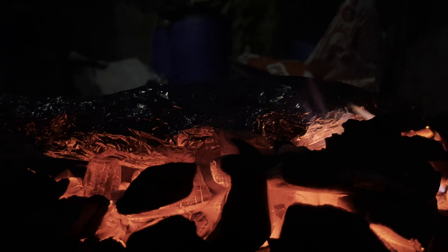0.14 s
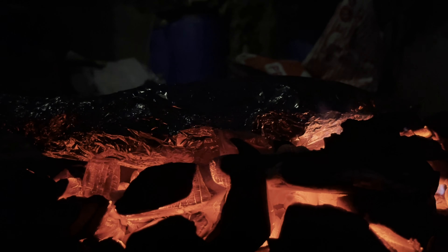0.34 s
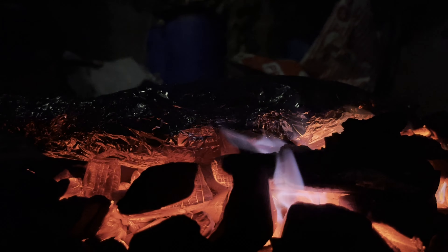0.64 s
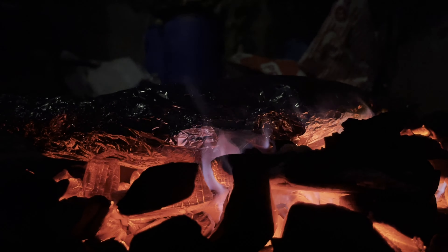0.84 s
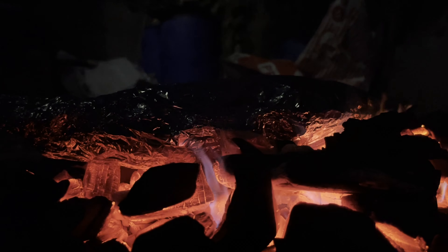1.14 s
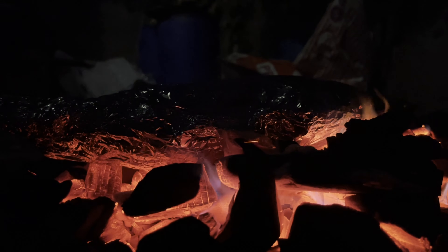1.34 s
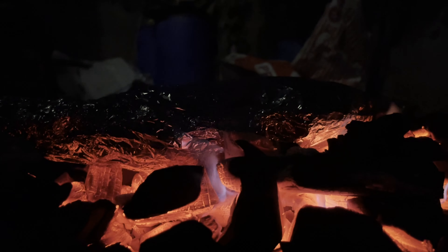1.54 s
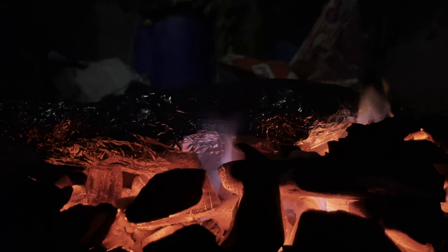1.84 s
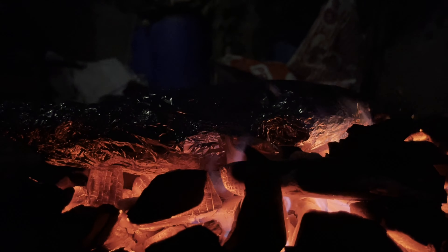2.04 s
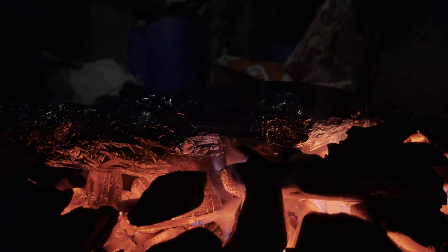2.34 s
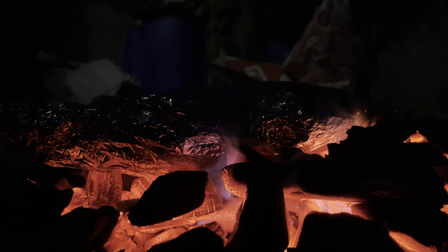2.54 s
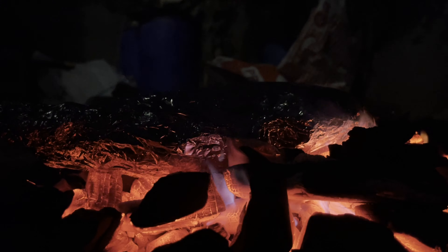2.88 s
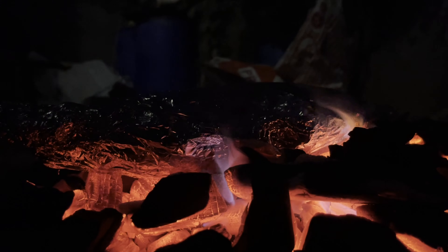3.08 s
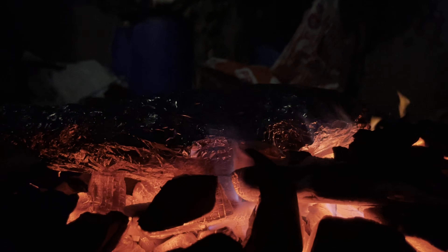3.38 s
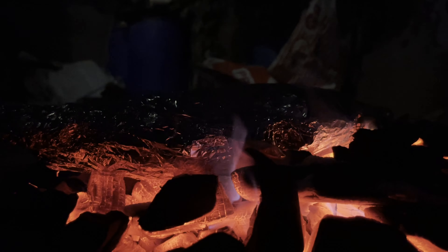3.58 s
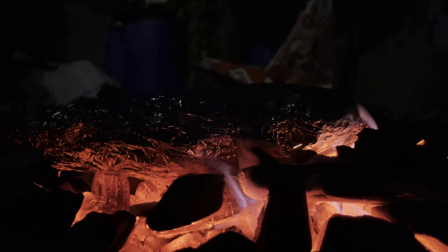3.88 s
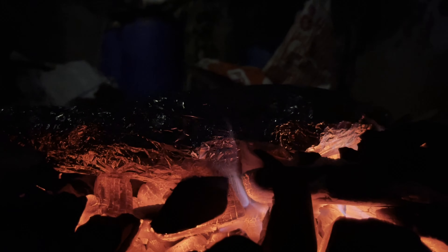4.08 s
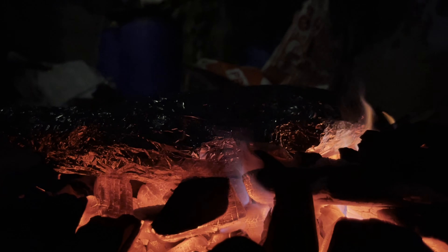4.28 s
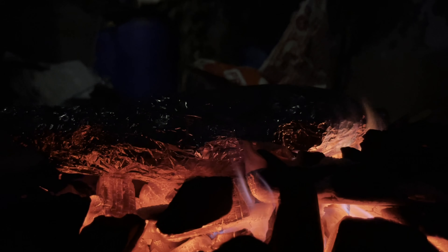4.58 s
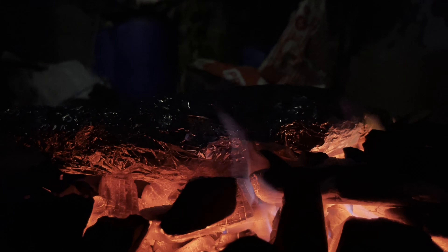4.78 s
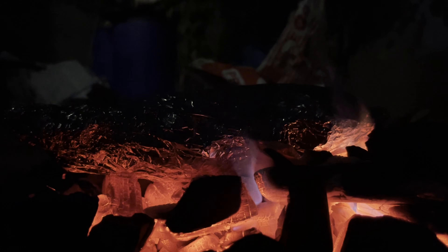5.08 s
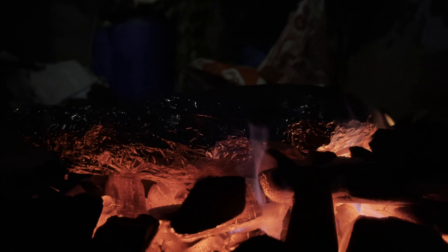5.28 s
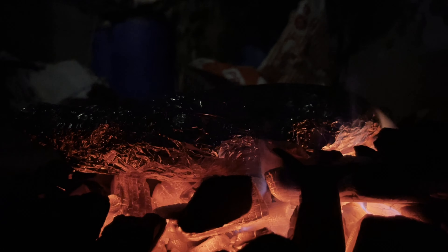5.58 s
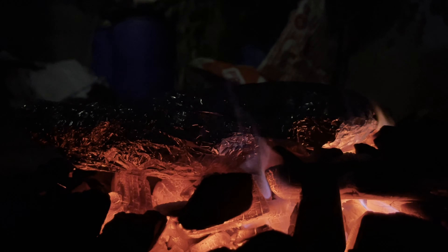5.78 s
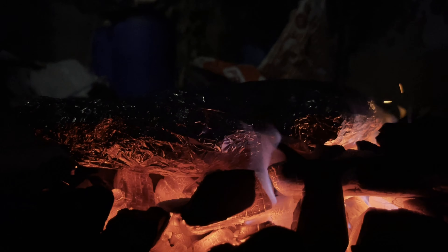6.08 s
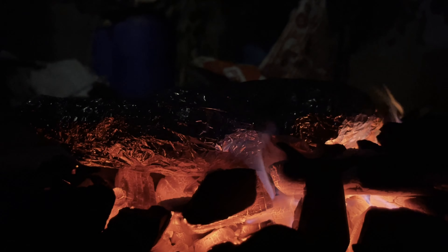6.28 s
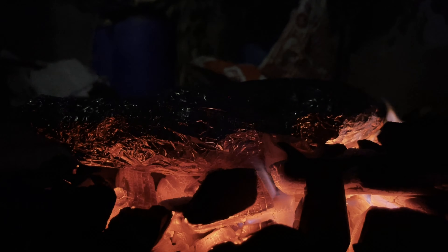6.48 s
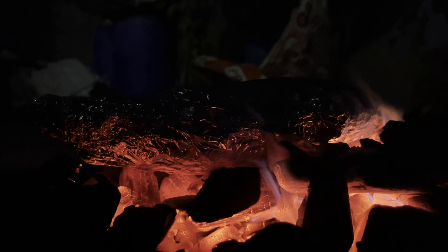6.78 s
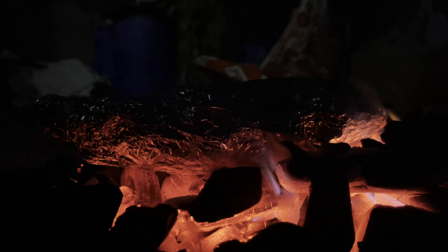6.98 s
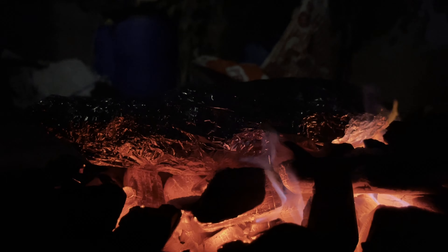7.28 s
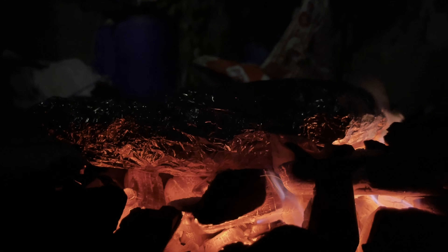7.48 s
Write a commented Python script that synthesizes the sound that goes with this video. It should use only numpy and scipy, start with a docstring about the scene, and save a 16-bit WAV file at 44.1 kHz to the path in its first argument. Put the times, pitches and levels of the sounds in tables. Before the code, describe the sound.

A close stereo perspective on glowing charcoal outdoors, dry and quiet. Throughout, a low flame rumble gusts gently beneath soft broadband hiss, fine high crackling in uneven clumps and faint gritty ash ticks; an almost inaudible thin hum near 530 Hz wavers far behind. From 0 to 1 second, small bright pops come often, with firmer snaps at about 0.4 and 0.7 and a brief splintery ring near 0.9. Sparse pops follow, with a dull settling knock at 2.2 and another near 2.6. A hard snap and knock land at 4.0. The loudest crack, piercing and briefly ringing, strikes at 4.85, with lesser snaps just after. Another sharp ringing crack comes at 5.45, then a pop at 6.0. Light crackle continues; knocks gather around 7.1 to 7.4, and a crisp pop with tiny low throbs closes after 7.5.

```python
"""Low flame rumble and hiss lie under bright pops of cracking char and a fine crackle.
It is a bed of charcoal embers under foil parcels outdoors, heard close by through a pair of microphone ports.
Rumble, hiss and crackle are shaped noise; pops are noise bursts that excite a ring in the port cavity.
Lumps settle as knocks of sagging pitch, splinters and foil ring as dying sines, ash ticks through resonators,
brief low notes swell, and a thin wavering hum stands far behind."""
import sys
import numpy as np
from scipy import signal
from scipy.fft import rfft, irfft
from scipy.io import wavfile
from scipy.ndimage import uniform_filter1d

SR = 44100
rng = np.random.default_rng(int(sys.argv[2]) if len(sys.argv) > 2 else 0)


def master_out(mix):
    """Clip the mix to full scale and print it as 16-bit PCM to the path in sys.argv[1]."""
    frames = np.transpose(np.atleast_2d(mix))
    ceiling = np.clip(frames, -1, 1)
    pcm = np.round(ceiling * 32767).astype(np.int16)
    wavfile.write(sys.argv[1], SR, pcm)


N = 336483
HZ = np.maximum(np.arange(N // 2 + 1) * SR / N, 1)   # spectrum bins, kept above zero for the logarithm
QUARTER_TURN = np.array([[0], [np.pi / 2]])   # phase of the two renderings of a tone, rad

# edges of the bands in which each crack gets its level: edge_hz
BAND_EDGES_HZ = [1800, 3300, 5200, 7500, 9800, 12300, 17000]


def amp(db):
    """Decibels to gain."""
    return 10 ** (np.asarray(db) / 20)


def rms_one(x):
    """Scale to unit power."""
    return x / np.sqrt(np.mean(x ** 2) + 1e-20)


def at_hz(points, hz):
    """Read a spectrum table on a log-frequency axis."""
    table_hz, table_value = np.array(points).T
    return np.interp(np.log(hz), np.log(table_hz), table_value)


def colour(x, spectrum):
    """Shape a steady sound by a spectrum table."""
    return irfft(rfft(x) * amp(at_hz(spectrum, HZ)), N)


def drift(rate_hz):
    """Slow chance of spread 1: noise through two equal poles, computed at every 40th sample."""
    r = np.exp(-80 * np.pi * rate_hz / SR)
    noise = rng.standard_normal(N // 40 + 2002)
    slow = signal.lfilter([1], [1, -2 * r, r * r], noise)[2000:]   # the filter has settled
    return np.interp(np.arange(N) / 40, np.arange(len(slow)), rms_one(slow))


def band(x, lo_hz, hi_hz):
    """Band-pass."""
    return signal.sosfilt(signal.butter(2, [lo_hz, hi_hz], "band", fs=SR, output="sos"), x)


def add(out, s, piece):
    """Mix a short sound in at a time."""
    i = int(s * SR)
    out[:, i:i + piece.shape[1]] += piece[:, :N - i]


def hum(pitch_hz=528.6, wander_hz=3.505, level_db=-66.5, flicker_db=2.5):
    """A thin far tone whose pitch and level waver a little."""
    phase = 2 * np.pi * np.cumsum(pitch_hz + wander_hz * drift(7.75)) / SR
    level = amp(level_db + flicker_db * drift(9.0))
    return level * rms_one(np.sin(phase + QUARTER_TURN))


def hiss(level_db=-55.5, flicker_db=1.76):
    """Flame hiss and far air: broad noise whose level flickers."""
    # colour of the hiss: freq_hz, relative_db (per Hz)
    hiss_colour = [(120, -10), (250, 3), (500, -4.5), (1000, -6.5), (2000, -14), (2900, -15), (4000, -23.5),
                   (5000, -20.5), (6300, -17), (7500, -19.5), (9500, -17), (11000, -14), (12200, -40),
                   (13000, -51)]
    level = amp(level_db + flicker_db * drift(27.4))
    return level * rms_one(colour(rng.standard_normal((2, N)), hiss_colour))


def rumble(level_db, gust_db=1, gust_rate_hz=3):
    """Low turbulence of the small flames: dark noise that gusts gently."""
    # colour of the rumble: freq_hz, relative_db (per Hz)
    rumble_colour = [(11, -63), (18, -34), (52, 0), (97, 2.5), (119, 2), (307, -21.5), (500, -21.5),
                     (650, -27.5), (1100, -120)]
    level = amp(level_db + gust_db * drift(gust_rate_hz))
    return level * rms_one(colour(rng.standard_normal((2, N)), rumble_colour))


def flames(rumble_db):
    """The steady bed: turbulent rumble and broad hiss, with the hum behind."""
    return rumble(rumble_db) + hiss() + hum()


def crackle(level_db, per_s, spread_db, clump_db, grain_t60):
    """Tiny cracks at random, in clumps, of very uneven size; each a short burst of noise."""
    # colour of the crackle: freq_hz, gain_db
    crackle_colour = [(1500, -16.5), (4000, -4), (7000, -8), (9000, 1.5), (10700, 8), (12000, -3.5),
                      (12700, -28), (14800, -59), (16400, -60)]
    born = rng.random(N) < per_s * amp(clump_db * drift(14)) / SR
    sizes = amp(spread_db * np.minimum(rng.exponential(1, N), 4.0))
    fade = amp(-60 / (grain_t60 * SR))   # per sample, grain_t60 in s
    shape = signal.lfilter([1], [1, -fade], born * sizes + 1e-18)
    return amp(level_db) * rms_one(colour(shape * rng.standard_normal((2, N)), crackle_colour))


def ticks(gain_db, per_s, spread_db, cycles):
    """Faint dull ticks of ash and grit, each a resonance that falls 60 dB in a few cycles of its pitch."""
    sizes = amp(spread_db * np.minimum(rng.exponential(1, N), 2.5))
    signs = rng.choice([-1, 1], (2, N))
    born = (rng.random(N) < per_s / SR) * sizes * signs
    dealt, out = rng.integers(0, 10, N), 0   # which of ten pitches each tick gets
    for k, hz in enumerate(np.geomspace(800, 5000, 10)):
        r, w = amp(-60 * hz / (cycles * SR)), 2 * np.pi * hz / SR
        hits = born * (dealt == k) + 1e-18
        out = out + signal.lfilter([0, np.sin(w)], [1, -2 * r * np.cos(w), r * r], hits)
    return amp(gain_db) * out


def throbs():
    """A low note swells briefly: a sine under a half-sine envelope."""
    # the swells: start_s, peak_db, pitch_hz, length_s
    swells = [(7.534, -37.5, 178, 0.012), (7.565, -36.5, 187, 0.04), (7.608, -36.5, 156, 0.01)]
    out = np.zeros((2, N))
    for s, peak_db, hz, length_s in swells:
        t = np.arange(int(length_s * SR)) / SR
        swell = amp(peak_db) * np.sin(np.pi * t / length_s)
        add(out, s, swell * np.sin(2 * np.pi * hz * t + QUARTER_TURN))
    return out


def knocks(sag=0.85, sag_cycles=0.33, rise_share=0.13, top_ratio=5.5, fall_bend=1.4):
    """A soft edge, then a few cycles whose pitch sags as the lump comes to rest; dull high above its pitch."""
    # lumps settling: start_s, peak_db (before dulling), pitch_hz (after the sag),
    # fall_cycles (to fall 30 dB; below 0.5 counts as 0.5)
    lumps = [(0.684, -41, 448, 2), (0.722, -39, 850, -0.5), (0.764, -43, 600, 2), (0.934, -43.5, 850, 2.5),
             (0.995, -47, 526, 6), (1.507, -48, 700, 2), (1.5462, -56, 620, 2), (1.675, -55, 840, 10),
             (1.7427, -43, 900, -3.5), (1.9606, -48, 650, 3.5), (2.0909, -46, 495, 7),
             (2.218, -30.5, 372, 2), (2.5843, -34.5, 960, 1.5), (3.02, -40, 650, 1.5),
             (3.069, -45, 520, 1.5), (3.1086, -42, 480, 2), (3.2645, -41, 890, 1.5),
             (3.4819, -43.5, 900, 0.5), (3.551, -42, 950, 1.5), (3.5643, -42.5, 855, 1.5),
             (3.8458, -38.5, 596, 2), (3.9725, -31.5, 910, 0.5), (4.478, -43, 750, 2), (4.651, -44, 800, 1),
             (4.7099, -46, 497, 1), (5.0273, -52, 620, 3), (5.2307, -36.5, 710, 2.5), (5.4493, -50, 794, 8),
             (5.4822, -46, 770, 6), (6.115, -48, 800, 4), (6.3028, -48.5, 620, 3), (6.8245, -43.5, 440, 3),
             (6.8394, -46.5, 550, 1.5), (7.0657, -42, 580, -2.5), (7.0962, -41.5, 575, 2.5),
             (7.2627, -38, 484, 1), (7.2904, -37, 714, 1), (7.3601, -34, 540, 2)]
    out, t = np.zeros((2, N)), np.arange(1300) / SR
    for s, peak_db, hz, cycles in lumps:
        turns, cycles = hz * t, max(cycles, .5)
        rise = 1 - np.exp(-turns / (rise_share * cycles))
        shape = rise * amp(-30 * (turns / cycles) ** fall_bend)
        phase = 2 * np.pi * (turns + sag * (1 - np.exp(-turns / sag_cycles)))
        knock = amp(peak_db) * shape / shape.max() * np.sin(phase + QUARTER_TURN)
        dull = signal.butter(4, top_ratio * hz, fs=SR, output="sos")
        add(out, s, signal.sosfilt(dull, knock))
    return out


def rings(rise_s=.0004, roughness=0.6, rough_s=0.004):
    """Dying sines, rough while the char still tears; opposed renderings leave them weaker at the right port."""
    # splinters and foil ringing after a crack, and the port cavity ringing on near 11 kHz after the loudest
    # cracks: start_s, pitch_hz, level_db (before rise and roughness), t60_s
    splinters = [(0.1646, 6100, -54, .02), (0.3866, 6150, -22, 0.0063), (0.684, 6000, -50, .015),
                 (0.7145, 4200, -49.5, .006), (0.735, 2500, -40, 0.03), (0.736, 2400, -46, .012),
                 (0.9245, 3260, -38, 0.0092), (0.9245, 5300, -41, .008), (0.9250, 4260, -31.5, 0.013),
                 (0.9256, 4470, -38, .009), (0.9625, 4400, -50, .025), (1.0388, 6500, -56, 0.01),
                 (1.171, 6240, -45, .01), (1.8093, 2750, -47.5, 0.022), (2.4608, 4900, -43.5, .015),
                 (2.4608, 5800, -49, .008), (2.4755, 5600, -50, .008), (2.559, 6500, -43, 0.02),
                 (2.9010, 4800, -48.5, 0.018), (2.9010, 5500, -34.5, 0.0061), (3.859, 5500, -43, .01),
                 (3.972, 6850, -11, 0.0039), (4.054, 2880, -49, .015), (4.0526, 3900, -44, 0.014),
                 (4.494, 5500, -51, .01), (4.8425, 2900, -27, 0.0095), (4.8413, 3160, -26, 0.041),
                 (4.8418, 3700, -23.5, 0.014), (4.842, 3880, -30, 0.022), (4.8418, 4630, -34, .012),
                 (4.8414, 5400, -29.5, 0.012), (4.8418, 6060, -36, .01), (4.8416, 7000, -34, .02),
                 (4.8412, 8900, -25, .012), (4.8414, 9130, -17, 0.004), (4.842, 10840, 0.5, 0.0066),
                 (5.2314, 2810, -37.5, 0.0078), (5.467, 3400, -46, 0.032), (5.466, 4000, -51, 0.027),
                 (5.4648, 4480, -30.5, 0.022), (5.4648, 4900, -33, 0.014), (5.4652, 7100, -29, 0.023),
                 (5.4651, 7540, -30, 0.016), (5.4653, 10970, -11.5, 0.0075), (5.4993, 3390, -50, .03),
                 (6.6688, 6040, -44, 0.022), (6.85, 2620, -43, 0.009), (7.097, 2570, -50.5, 0.011),
                 (7.147, 1400, -43, .01), (7.292, 2520, -38, .006), (7.5352, 11230, -18.5, 0.0071),
                 (7.5365, 6270, -44, .01)]
    out, t = np.zeros((2, N)), np.arange(3000) / SR
    noise = rng.standard_normal((len(splinters), len(t)))
    tearing = rms_one(uniform_filter1d(noise, size=24, axis=1))
    for (s, hz, level_db, t60), tear in zip(splinters, tearing):
        rough = 1 + roughness * tear * np.exp(-t / rough_s)
        shape = amp(level_db - 60 * t / t60) * (1 - np.exp(-t / rise_s))
        add(out, s, shape * rough * np.sin(2 * np.pi * hz * t) * [[1], [-1]])
    return out


def all_pops(count=70, level_db=-57, under_db=-6.5, fall_db=15.5, t60_s=0.011):
    """The listed cracks in the char, then faint ones at random times."""
    # cracks: start_s, level_db (rms of the first 3 ms in the port-ring band), under_db (below the ring,
    # against level_db, before the fall), fall_db_per_octave (below), t60_s
    listed = [(0.0543, -48, -12.5, 3, 0.0108), (0.079, -47, 0.5, 16, 0.023),
              (0.1642, -40.5, -5.5, 19, 0.0078), (0.2037, -49, -7, 17, 0.0087),
              (0.3852, -45, 0, 20, 0.0092), (0.3863, -33, 0, 29, 0.0067), (0.424, -54, 1, 5, 0.0103),
              (0.4675, -40.5, -35, 9, 0.0038), (0.5336, -50.5, 8, 24, 0.0059),
              (0.5621, -41, -6.5, 15, 0.018), (0.7254, -48, -8, 7, 0.016), (0.7346, -32.5, -2, 22, 0.0048),
              (0.7368, -40, -5, 19, .008), (0.7398, -38, -5, 21, 0.008), (0.8244, -58.5, -7, -7, 0.0087),
              (0.847, -47.5, 2.5, 17, 0.0054), (0.8687, -55, 10.5, 30, 0.0074),
              (0.9245, -46, 3.5, 12, 0.014), (0.9622, -48, -1, 9, 0.016), (1.0388, -37.5, -4.5, 10, 0.0087),
              (1.0535, -51, -3, 12, .006), (1.0923, -49.5, -6, 14, 0.014), (1.171, -48.5, -4, 10, 0.0035),
              (1.282, -62, -11, 20, 0.006), (1.383, -57, 2, 12, 0.01), (1.431, -43.5, -18, 8, 0.005),
              (1.4411, -49.5, 9, 59, 0.0066), (1.4696, -47, -16, 20, 0.0095), (1.528, -47, -23, 4, 0.0048),
              (1.7024, -45, -6.5, 5, 0.0062), (1.8093, -52, 1, 17, 0.0114), (1.828, -49, 2.5, 20, 0.006),
              (1.8739, -48, -11, 0.5, 0.01), (2.204, -50.5, 4.5, 36, 0.011),
              (2.2198, -52, -1.5, 8.5, 0.013), (2.4608, -56, 1, 9, 0.013), (2.5195, -71, 1, 20, 0.01),
              (2.5586, -40, -4, 25, 0.021), (2.63, -48.5, -7.5, 6, 0.0098), (2.6562, -54.5, 4.5, 19, 0.022),
              (2.7842, -48, -7, 12, 0.0088), (2.8328, -43.5, -5.5, 9, 0.01), (2.9265, -44, -12, 14, 0.0061),
              (2.9392, -53, -14, -3, .006), (2.95, -58, -12, 15, .005), (2.9602, -42, -4, 28, 0.01),
              (2.9693, -53, 0, 25, .005), (3.292, -50, -7, 11, 0.0119), (3.305, -45, -12, 8, 0.011),
              (3.6781, -47, -11, 14, 0.0059), (3.7567, -63, 13, 10, 0.012), (3.9722, -27, -10, 9, 0.0033),
              (3.9845, -49, -20, 10, 0.003), (4.0535, -46, 4, 32, 0.018), (4.494, -57, 1, 18, 0.008),
              (4.5068, -52.5, 6, 31, 0.0071), (4.5258, -53, -10, 0, 0.011), (4.5478, -53, 3.5, 25, 0.013),
              (4.6293, -51.5, 7, 41, 0.0096), (4.7544, -46.5, -3, 23, 0.0068), (4.8412, -20, 3, 44, 0.0058),
              (4.9335, -36.5, -4.5, 24, 0.0066), (4.941, -45, 1, 23, 0.0069),
              (4.9464, -49, -10, 20, 0.0087), (5.0452, -50, 1.5, 17, 0.015), (5.085, -49.5, -9, 4, 0.0062),
              (5.18, -49.5, -10, 14, 0.0064), (5.246, -52.5, 3, 18, 0.014), (5.3477, -48.5, 2, 25, 0.012),
              (5.3616, -50.5, 5, 33, 0.0067), (5.395, -54.5, 1, 2, 0.013),
              (5.4645, -26.5, -20.5, 7.5, 0.0062), (5.5052, -43, -12, 4, 0.018),
              (5.517, -42, -14, 9, 0.0049), (5.5529, -52, -9, 9, 0.0075), (5.5874, -47, -10, 22, 0.0151),
              (5.7274, -48, -28.5, -3, 0.0042), (5.7464, -39.5, -9.5, 19, 0.0047),
              (5.91, -49.5, -8, 15, 0.013), (5.9891, -37.5, -10.5, 8, 0.0061), (6.3695, -46, -2, 11, 0.016),
              (6.437, -44, -15, 4, 0.008), (6.5298, -45, 3.5, 44, 0.0048), (6.6784, -46, -2.5, 10, 0.012),
              (6.756, -43, -23, 2, 0.0043), (6.7803, -43, -23.5, -0.5, 0.0037),
              (6.8979, -48, -38, -2, 0.0068), (7.093, -48.5, -7, 3, 0.0079), (7.2605, -52, 0, 20, .005),
              (7.2643, -46.5, -2.5, 14, 0.0058), (7.323, -50.5, 3.5, 41, 0.0073),
              (7.362, -42.5, -6, 24, 0.0043), (7.3938, -41.5, -2, 22, 0.004),
              (7.5349, -37, -13, 23, 0.0061), (7.59, -45.5, -8, 13, 0.014)]
    luck = rng.standard_normal((count, 4))
    s = rng.uniform(0, N / SR, count)
    faint = np.transpose([s,
                          level_db + 1 * luck[:, 0],
                          under_db + 8.1 * luck[:, 1],
                          fall_db + 3.0 * luck[:, 2],
                          t60_s * amp(4.0 * luck[:, 3])])
    return np.vstack([listed, faint])


def pop_bands(level_db, under_db, fall_db):
    """Level of each crack in each band: set at the port ring, with a fall by octaves below it."""
    chance_db = 1.5   # chance colour of the lower bands, dB per octave down
    above_db, above_follows = -12, .4   # band above the ring; share of under_db that it follows
    above_slope, slope_from_db = 0.42, -21   # level rule of the band above the ring: dB per dB, from this level
    centres = np.sqrt(np.multiply(BAND_EDGES_HZ[:-1], BAND_EDGES_HZ[1:]))
    octaves_down = np.log2(centres[3] / centres[:4])[:, None]   # from the band just under the ring
    chance = rng.standard_normal((len(level_db), 4)).T
    below = under_db - fall_db * octaves_down + chance_db * octaves_down * chance
    above = above_follows * under_db + above_db + above_slope * (level_db - slope_from_db)
    return level_db + np.vstack([below, 0 * level_db, above])


def port_ring(x, hz=10850, width_hz=700, lift_db=16.0):
    """The port cavity rings briefly after every crack: a narrow resonance added to the sound."""
    r = np.exp(-np.pi * width_hz / SR)
    poles = [1, -2 * r * np.cos(2 * np.pi * hz / SR), r * r]
    ring = signal.lfilter(np.array([1, 0, -1]) * (1 - r * r) / 2, poles, x)
    return x + amp(lift_db) * ring


def pops(rise_s=0.000063, tail_db=-12.0, tail_t60=0.05, tail_shrinks=0.3):
    """A burst of tearing dies fast, then scatters faintly among the coals, less in share after loud ones."""
    out, t = np.zeros((2, N)), np.arange(2200) / SR
    s, level_db, under_db, fall_db, t60 = np.transpose(all_pops())
    tearing = rng.standard_normal((len(s), 2, len(t)))
    rise = 1 - np.exp(-t / rise_s)
    snap = rise * amp(-60 * t / np.maximum(t60, .002)[:, None])
    shape = snap / snap.max(axis=1, keepdims=True)
    tail_share = amp(tail_db - tail_shrinks * (level_db - level_db.mean()))[:, None, None]
    scatter = band(band(tearing, 1500, 11400), 1500, 11400) * rise * amp(-60 * t / tail_t60)
    bursts = port_ring(tearing * shape[:, None]) + scatter * tail_share
    cracks = 0
    levels = pop_bands(level_db, under_db, fall_db)
    for lo_hz, hi_hz, band_db in zip(BAND_EDGES_HZ, BAND_EDGES_HZ[1:], levels):
        part = band(band(bursts, lo_hz, hi_hz), lo_hz, hi_hz)
        start = part[..., :int(.003 * SR)]
        start_rms = np.sqrt(np.mean(start ** 2, axis=2, keepdims=True))
        cracks = cracks + part * amp(band_db)[:, None, None] / start_rms
    for at, crack in zip(s, cracks):
        add(out, at, crack)
    return out


def ports(x, nearness):
    """Left hears the first rendering; right hears it shifted in phase, mixed with the second rendering."""
    # right port against left: freq_hz, phase_lead_rad; the treble arrives about 0.3 ms early
    right_lead = [(20, .05), (1000, .05), (1900, .6), (3000, -1.0), (4200, -.4), (5000, -1.0), (6200, -.3),
                  (7300, -1.1), (8500, .1), (10220, 3.14), (13550, 9.4), (15200, 12.5), (16500, 14.9)]
    # left-right likeness of a sound of nearness 0: freq_hz, likeness (0 to 1)
    likeness = [(30, 0.8), (60, 1), (200, 0.87), (600, 0.47), (1500, 0.36), (2500, 0.7), (5000, 0.57),
                (7000, 0.31), (8500, 0.85), (11000, 1), (16000, 0.77)]
    # balance of the ports: freq_hz, left_minus_right_db
    left_up = [(60, 0.6), (700, 0.5), (1400, 3.5), (2500, 1), (5000, 1.6), (8000, 0.5), (16000, -1)]
    alike = np.clip(at_hz(likeness, HZ), .01, 1) ** (1 - nearness)   # near sounds reach both more alike
    lead = np.exp(1j * np.interp(HZ, *np.transpose(right_lead)))
    first, second = rfft(x)
    right = lead * (alike * first + np.sqrt(1 - alike ** 2) * second)
    tilt = amp(at_hz(left_up, HZ) / 2)
    return irfft(np.array([first * tilt, right / tilt]), N)


def scene():
    """Steady fire around the ports, cracks and knocks close in front."""
    # the fire, before the ports: start_s, rumble_db, fine_crackle_db; levels glide between rows
    fire = [(0.0, -39.5, -63), (0.1, -51.5, -58), (0.13, -40.5, -58), (0.87, -43.5, -56.5),
            (1.08, -44.5, -60), (3.04, -47, -58), (3.23, -40.5, -60.5), (3.29, -49.5, -57.5),
            (3.61, -44, -57.5), (4.29, -47.5, -59.5), (5.87, -46, -61), (5.93, -42.5, -55),
            (5.99, -49.5, -58.5), (6.12, -40, -58.5), (6.2, -45.5, -57.5), (6.35, -47, -60),
            (7.39, -47.5, -58.5), (7.63, -47, -59.5)]
    s, *columns = np.transpose(fire)
    rumble_db, crackle_db = [np.interp(np.arange(N) / SR, s, c) for c in columns]
    fine = crackle(crackle_db, per_s=900.0, spread_db=1.5, clump_db=2.0, grain_t60=0.0071)
    sparse = crackle(crackle_db - 14.5, per_s=250.0, spread_db=9.5, clump_db=7.0, grain_t60=0.02)
    grit = ticks(gain_db=-54.0, per_s=110.0, spread_db=2.3, cycles=6.0)
    around = flames(rumble_db) + fine + sparse + grit
    in_front = pops() + rings() + knocks() + throbs()
    return ports(around, nearness=0.042) + ports(in_front, nearness=0.74)


def record(dry):
    """The capsule loses the deep bass, the loudest peaks are rounded, the top is cut."""
    x = signal.sosfilt(signal.butter(2, 32.0, "high", fs=SR, output="sos"), dry)
    x = .95 * np.tanh(x / .95)
    return signal.sosfilt(signal.cheby2(12, 70, 16750, fs=SR, output="sos"), x)   # 70 dB down from 16750 Hz


dry = scene()
out = record(dry)
master_out(out)
```